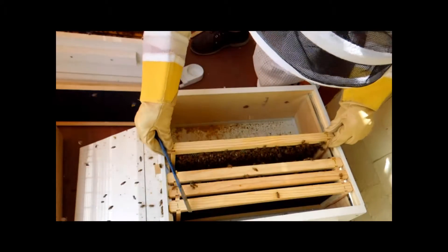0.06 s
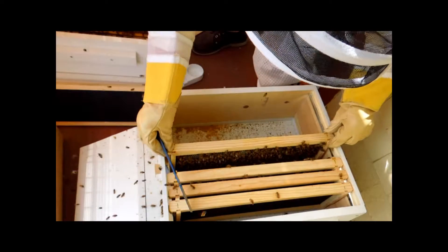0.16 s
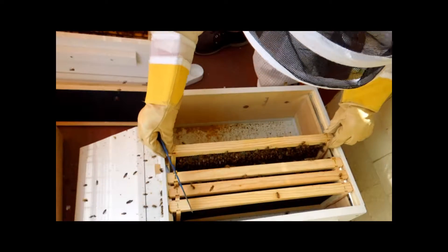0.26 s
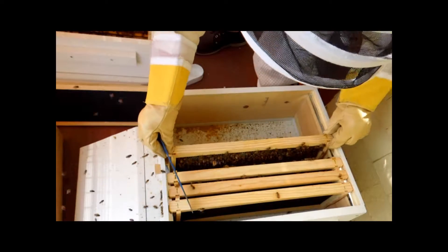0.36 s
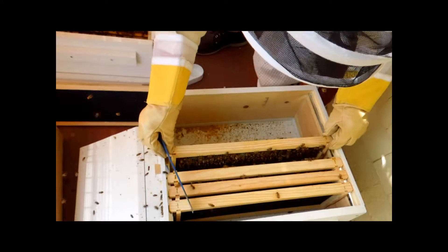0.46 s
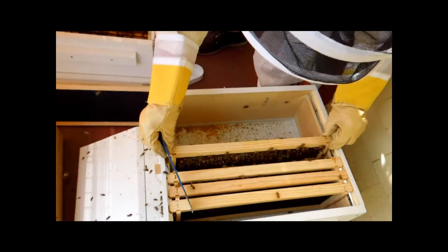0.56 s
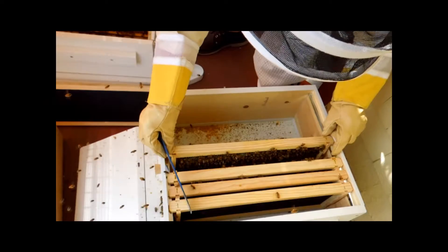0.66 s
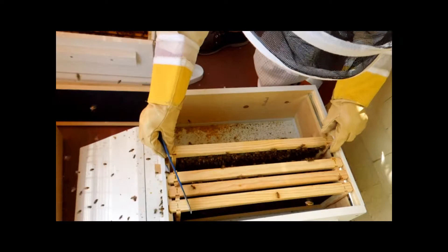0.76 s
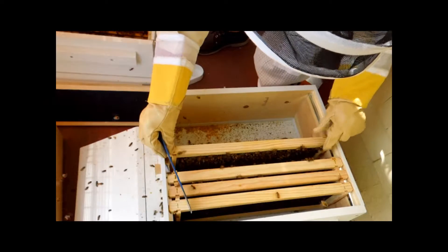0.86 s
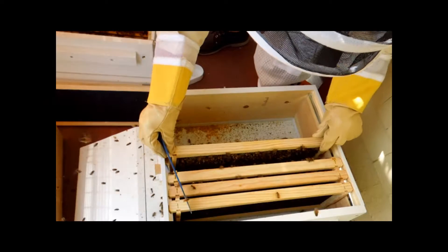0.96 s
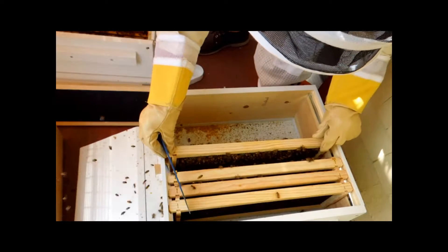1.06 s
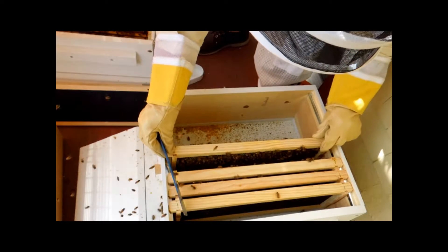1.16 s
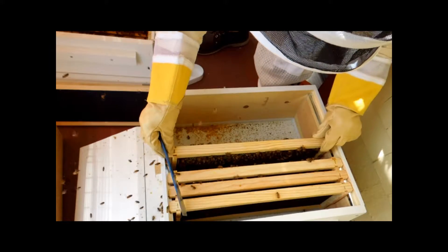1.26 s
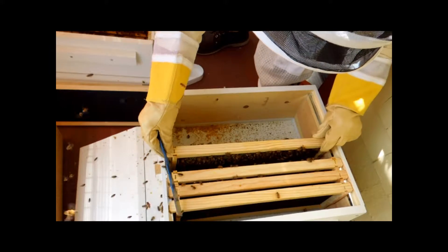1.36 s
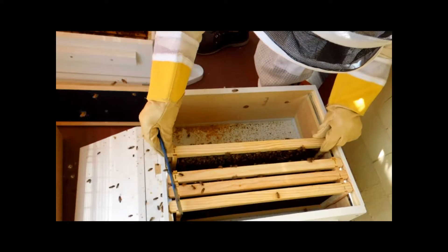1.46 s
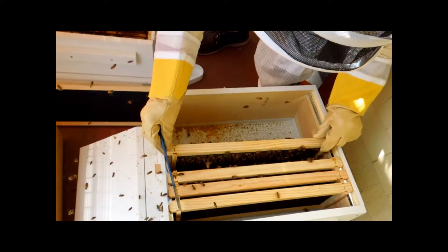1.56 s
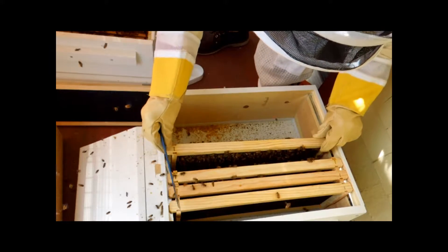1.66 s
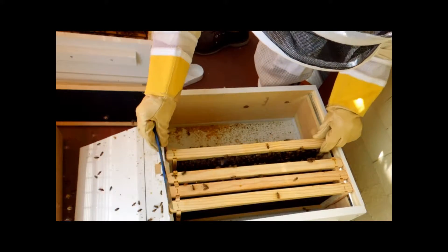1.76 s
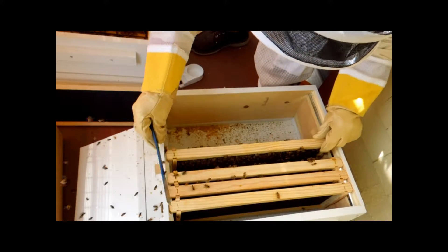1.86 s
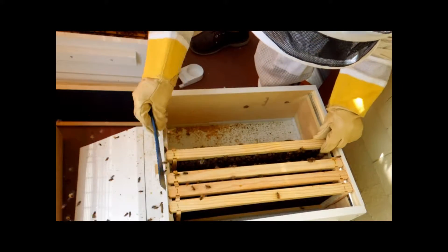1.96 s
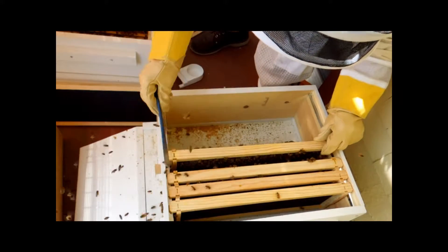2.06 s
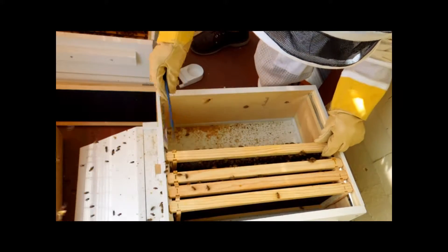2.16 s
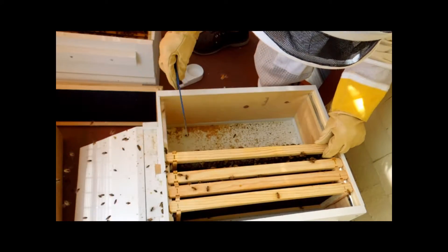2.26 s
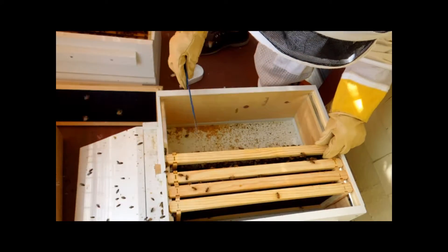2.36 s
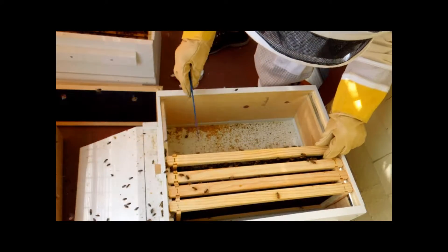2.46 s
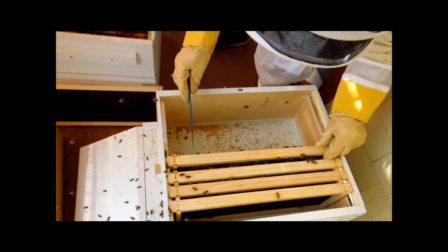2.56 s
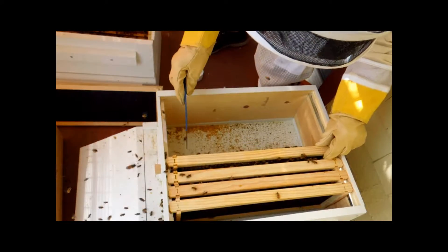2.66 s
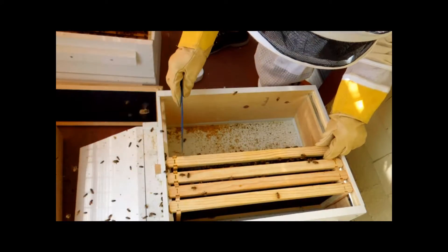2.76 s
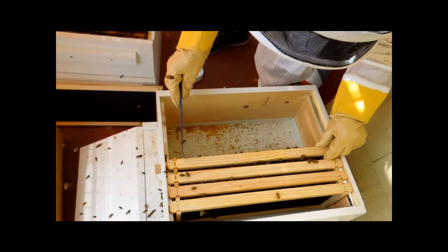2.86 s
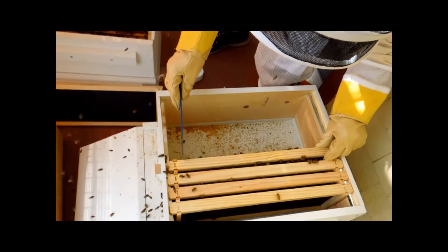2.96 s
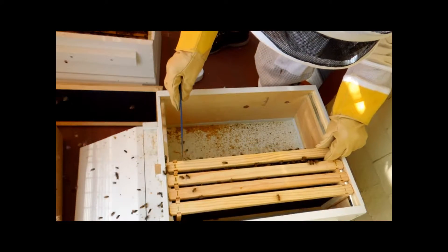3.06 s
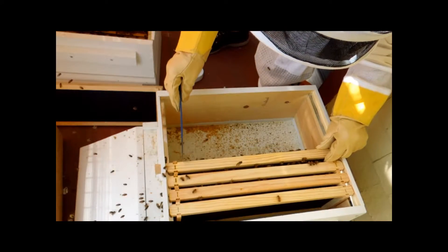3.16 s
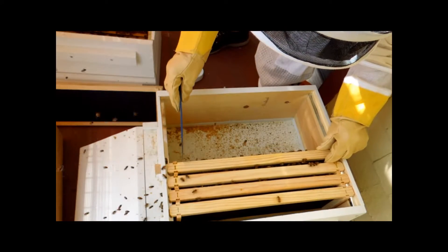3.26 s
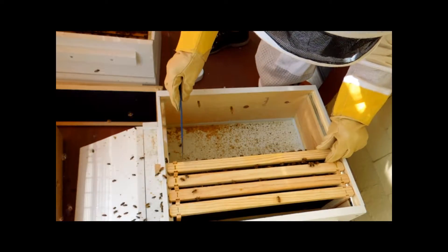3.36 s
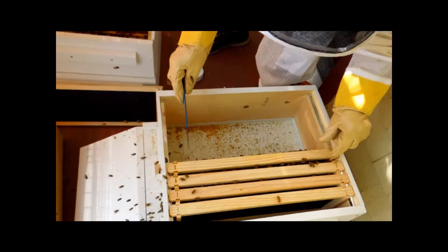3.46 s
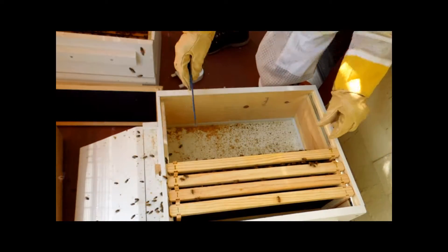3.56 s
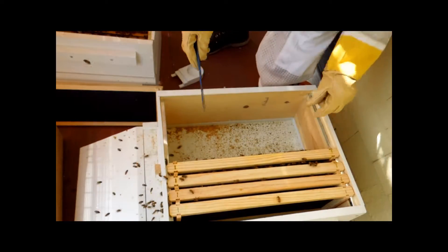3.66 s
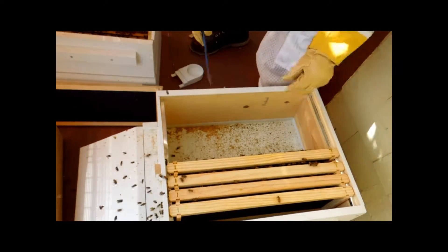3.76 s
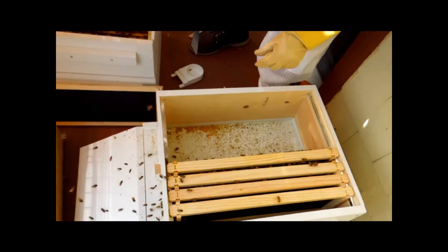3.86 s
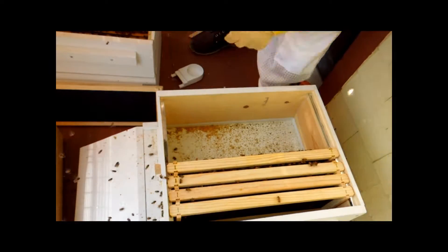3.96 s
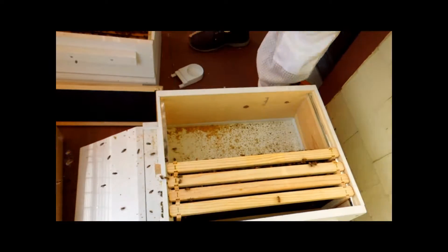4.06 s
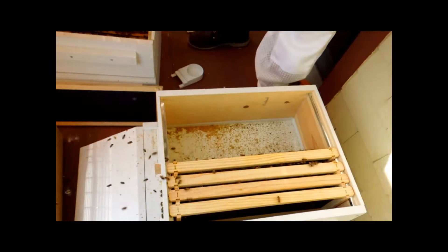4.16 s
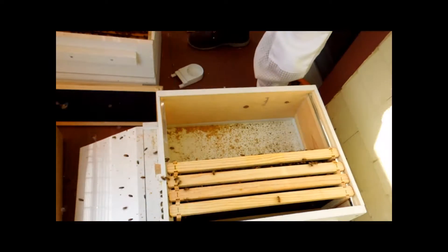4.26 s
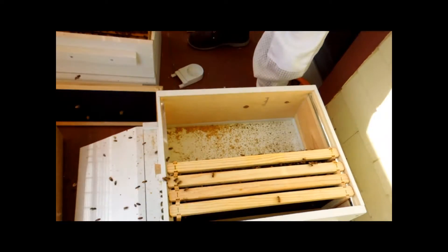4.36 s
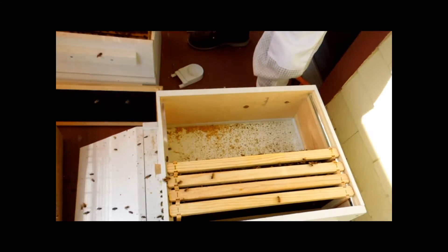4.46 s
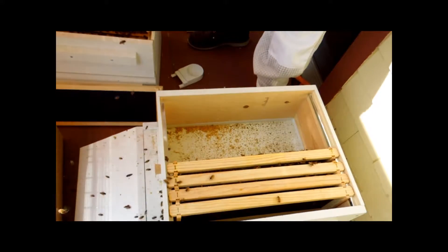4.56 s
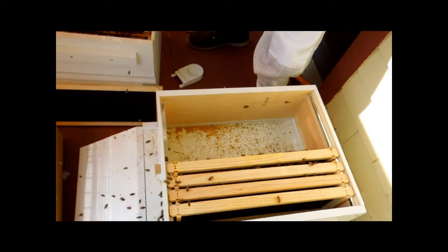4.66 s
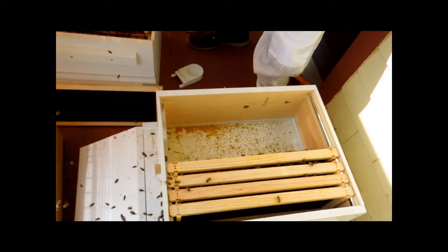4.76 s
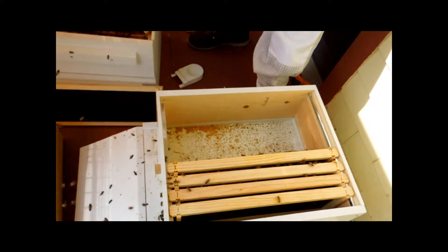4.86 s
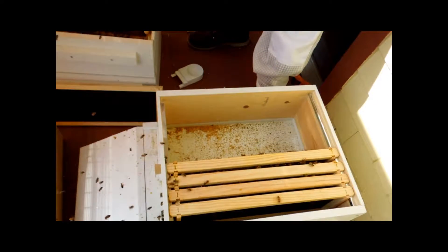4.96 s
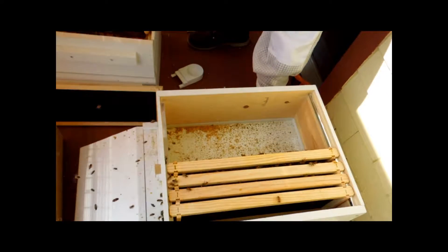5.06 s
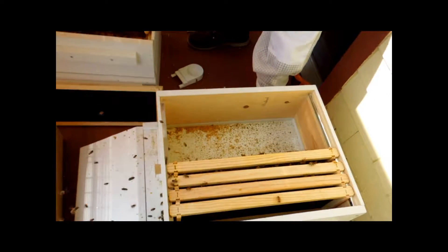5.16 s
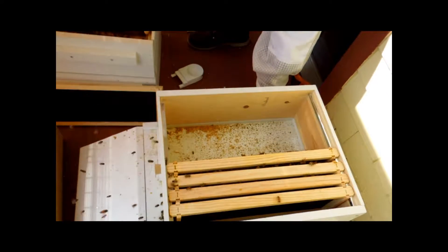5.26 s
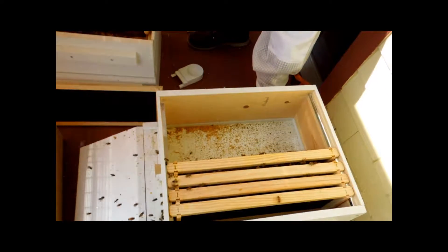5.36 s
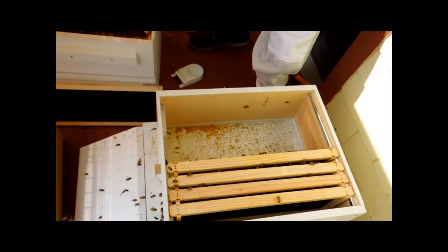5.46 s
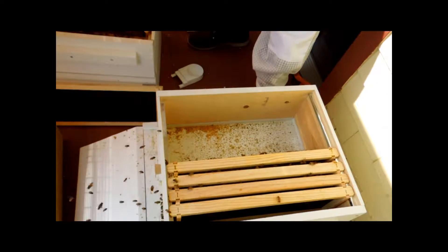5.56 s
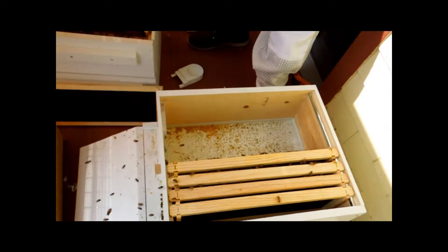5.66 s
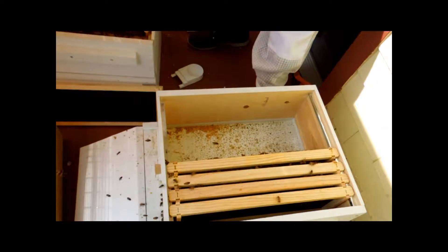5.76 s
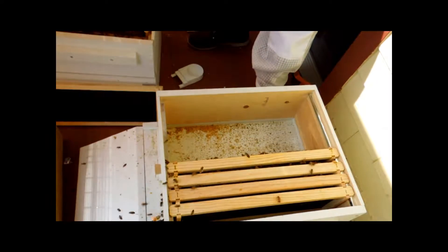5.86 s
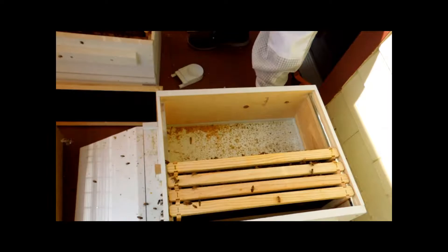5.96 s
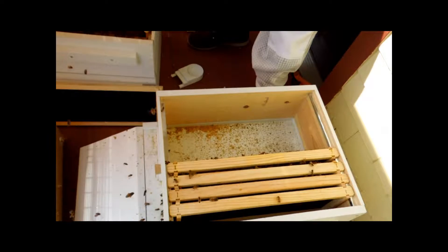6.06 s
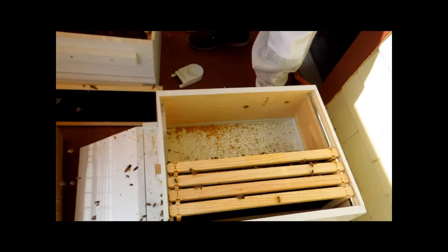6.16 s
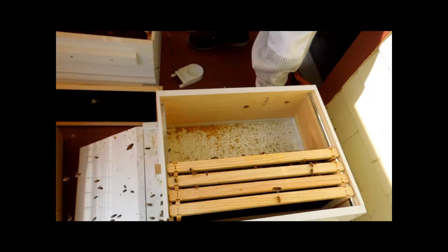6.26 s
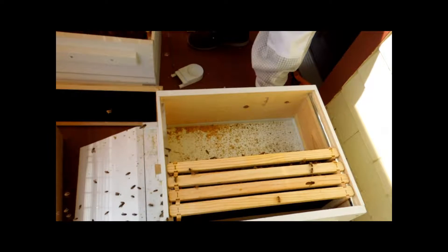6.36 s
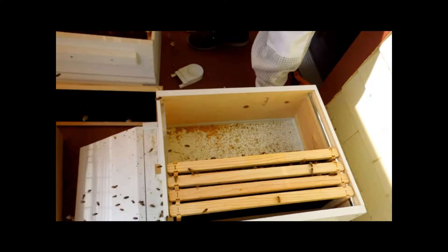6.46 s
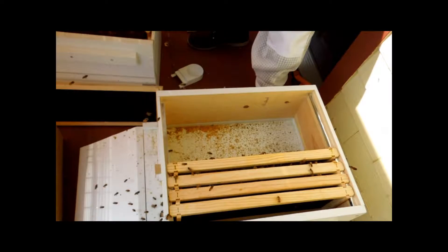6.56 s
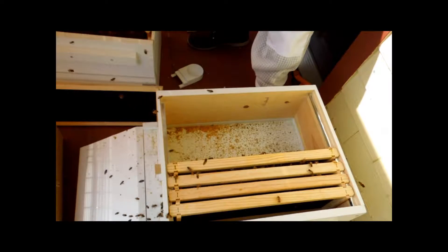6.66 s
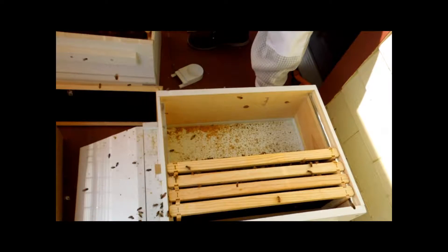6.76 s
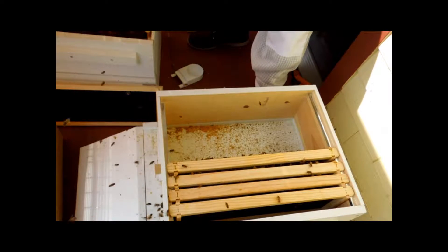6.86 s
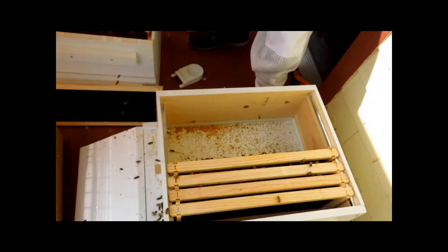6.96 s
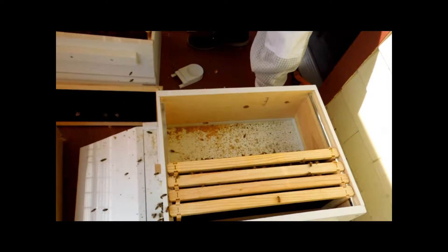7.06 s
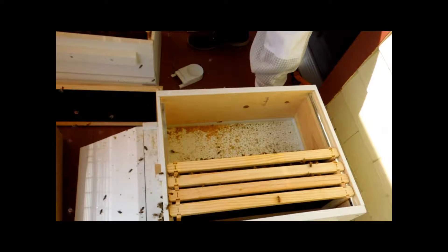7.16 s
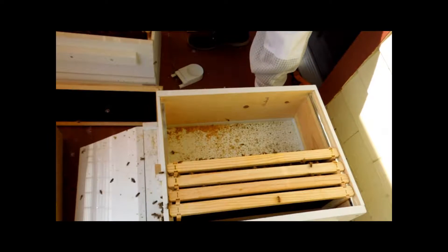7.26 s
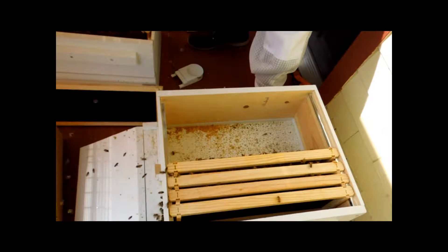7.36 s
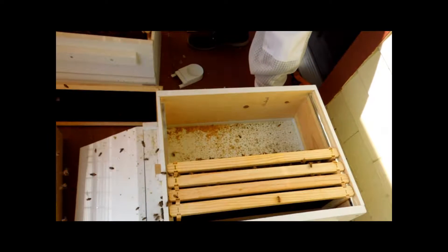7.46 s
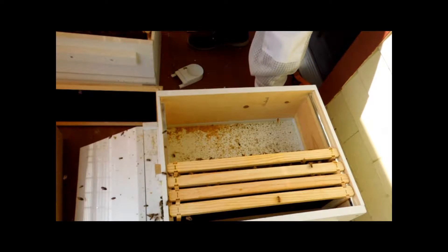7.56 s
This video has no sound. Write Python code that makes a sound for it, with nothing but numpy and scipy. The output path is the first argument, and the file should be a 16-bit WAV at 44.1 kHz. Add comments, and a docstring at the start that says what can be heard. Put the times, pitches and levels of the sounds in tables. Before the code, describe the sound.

Honey bees hum around an open hive outdoors, with one sharp wooden knock as a vehicle's drone slowly draws nearer.

```python
"""Honey bees hum around an open hive outdoors, each wing stroke a push of air; late on, one hovers close.
A beekeeper shifts frames: one knocks against the box, both ring, and the gain control dips after it.
A vehicle nears all the while: its exhaust drone climbs and swells, and its tyre roar rises at the end.
Gloves and suit rustle faintly, there is one soft bump, and a far bird chirps over the outdoor hiss."""
import sys
import numpy as np
from scipy import signal
from scipy.fft import rfft, irfft
from scipy.io import wavfile
from scipy.ndimage import uniform_filter1d, map_coordinates

SR = 44100
rng = np.random.default_rng(int(sys.argv[2]) if len(sys.argv) > 2 else 0)


def to_wav(s):
    """Save 16-bit WAV."""
    ch = np.atleast_2d(s).T  # columns
    pcm = np.round(np.clip(ch, -1, 1) * 32767)  # PCM
    wavfile.write(sys.argv[1], SR, pcm.astype(np.int16))


N = 335592
TIME = np.arange(N) / SR
BINS_HZ = np.fft.rfftfreq(N, 1 / SR)


def wingbeats(beat_hz, sharpness=500):
    """One sharp push of air per wing stroke."""
    strokes = np.cumsum(beat_hz) / SR + rng.random()
    return np.exp(sharpness * (np.cos(2 * np.pi * strokes) - 1))


# swarm filter (frequency [Hz], relative gain [dB])
SWARM_FILTER = [(100, 48), (230, 11), (340, 12.5), (430, 8.5), (520, 4), (630, -7.5), (750, -7),
                (1150, -10.5), (1800, -17.5), (3000, -23.5), (6000, -32), (12000, -59)]

def bees(count=20, wing_hz=232, spread=.14, swerve=.04, distance_db=7, swarm_db=-42, stir_db=1.5, stir_s=5):
    """Each bee has its own wingbeat rate; its pitch and distance drift in flight."""
    swarm = np.zeros(N)
    for place in np.linspace(-1, 1, count):
        beat_hz = wing_hz * np.exp(spread * place + swerve * wander(3) + .006 * wander(30))
        swarm += wingbeats(beat_hz) * amp(distance_db * np.tanh(wander(3.022)))
    pressure = np.diff(swarm, prepend=swarm[0])
    restless_db = stir_db * np.minimum(TIME / stir_s, 1)  # moving the frames stirs the colony
    return colour(pressure, SWARM_FILTER) * amp(swarm_db + restless_db)


# closest bee's flight (time [s], wingbeat [Hz], level [dB])
NEAR_BEE_FLIGHT = [(4.7, 235, -76), (5.2, 239.8, -52.5), (5.75, 242.6, -54), (6.0, 250.7, -47.5),
                   (6.4, 257.3, -46), (6.9, 252.4, -45), (7.3, 256.2, -45), (7.61, 259, -51)]
# its wing filter (frequency [Hz], relative gain [dB])
NEAR_BEE_FILTER = [(150, -22), (250, -3), (500, -1), (770, 2.5), (1050, 0), (1480, 1.5), (2000, -0.5),
                   (2700, -8), (3600, -7.5), (6000, -14), (12000, -40)]

def near_bee(waver=0.00698, bob_db=2):
    """One bee hovers close; its rasping overtones stand out from the swarm."""
    buzz = wingbeats(curve(NEAR_BEE_FLIGHT) * np.exp(waver * wander(14)))
    level_db = curve(NEAR_BEE_FLIGHT, column=2) + bob_db * wander(7)
    return colour(buzz, NEAR_BEE_FILTER) * amp(level_db)


# frame meets box and settles (time [s], level [dB], decay [s])
CONTACTS = [(1.9017, -14, 0.0075), (1.9037, -10.5, 0.0037), (1.9095, -23.5, 0.023), (1.9264, -31, 0.011)]
# contact noise (frequency [Hz], relative level [dB])
CRACK_SPECTRUM = [(150, -8), (400, 7), (900, -2), (1500, -1), (3300, -4), (4300, -7), (4950, -5),
                  (6300, -10), (9000, -6), (12000, -1.5), (14200, -6.5)]
# frame and box modes (frequency [Hz], level [dB], t60 [s])
WOOD_MODES = [(105, -45, 0.1), (132.5, -7, 0.13), (187, -12, 0.17), (237, -29, 0.19), (275.4, -18, 0.23),
              (399, -12, 0.093), (483, -27, 0.19), (526, -16, 0.07), (574, -30, .06), (780, -18.5, 0.057),
              (995, -18, .08), (1146, -27, 0.12), (1250, -30, 0.11), (1530, -37, 0.063), (1910, -22, 0.069),
              (2740, -21, 0.058), (3040, -19, 0.042), (3370, -27, 0.068), (3830, -25, 0.038),
              (4870, -18, 0.049)]

def frame_knock(build_s=0.0021, settle_db=-9):
    """Quick contacts crack; the hardest rings frame and box, the last nudges them again."""
    contact = sum(amp(db) * (TIME >= s) * np.exp(-abs(TIME - s) / decay_s) for s, db, decay_s in CONTACTS)
    crack = contact * port_noise(CRACK_SPECTRUM)
    hardest_s, last_s = max(CONTACTS, key=lambda row: row[1])[0], CONTACTS[-1][0]
    age_s = TIME[:SR // 2]
    ring = sum(amp(db - 60 * age_s / t60) * np.sin(2 * np.pi * hz * age_s) for hz, db, t60 in WOOD_MODES)
    ring *= 1 - np.exp(-age_s / build_s)
    dull_ring = uniform_filter1d(ring, size=16)
    strike = np.interp(TIME - hardest_s, age_s, ring)
    nudge = amp(settle_db) * np.interp(TIME - last_s, age_s, dull_ring, left=0)
    return crack - strike - nudge


# firing note, swelling and fading as its path changes (time [s], level before beating [dB])
FIRING_LEVEL = [(0.0, -57.5), (0.3, -38.5), (2.42, -35), (2.76, -27.1), (3.14, -33), (3.66, -27),
                (4.14, -39), (4.6, -25.8), (5.06, -25), (5.18, -32.5), (5.28, -25), (6.2, -27),
                (6.3, -18.5), (6.44, -30.5), (6.54, -22.5), (7.28, -28), (7.6, -13)]

def firing_note_db(beat_hz=2.33, reflection_share=.48, from_s=4, dip_s=5.41):
    """Once the vehicle is close, a reflection with another Doppler shift beats against the note."""
    share = reflection_share * np.clip(TIME - from_s, 0, 1)
    return curve(FIRING_LEVEL) + interference_db(share, beat_hz * (TIME - dip_s) + .5)


# lesser exhaust overtones (order [x cycle rate], relative level [dB])
OVERTONE_ORDERS = [(6, -29), (7, -38), (9, -16.5), (10, -9), (11, -31.5), (12, -28.5), (13, -25), (14, -32),
                   (15, -19), (16, -22), (17, -27), (18, -25)]
# their growth on approach (time [s], base level [dB])
OVERTONE_SWELL = [(0, -45), (1.3, -40.5), (2.9, -37), (4.1, -34), (5.6, -28), (7.1, -29), (7.6, -26)]
# pipe resonances (centre [Hz], half width [Hz], lift [dB])
PIPE_RESONANCES = [(154.5, 3, 8), (208, 17.5, 28)]

def overtones_db(cycle_hz, echo_share=0.36, lag_s=.02773, lag_drift_s_per_s=-.000176, fade_db=2.0):
    """Pipe resonances lift passing overtones; a wall echo of shrinking lag lifts and cuts them in turn."""
    swell_db = curve(OVERTONE_SWELL)
    echo_s = lag_s + lag_drift_s_per_s * TIME
    orders = []
    for order, db in OVERTONE_ORDERS:
        hz = order * cycle_hz
        pipe_db = sum(lift / (1 + ((hz - centre) / width) ** 2) for centre, width, lift in PIPE_RESONANCES)
        echo_db = interference_db(echo_share, hz * echo_s)
        orders.append((order, swell_db + db + pipe_db + echo_db + fade_db * wander(4)))
    return orders


# engine speed (time [s], four-stroke cycle rate [Hz])
ENGINE_SPEED = [(0.0, 15.35), (0.45, 15.35), (1.3, 15.9), (2.5, 16.55), (3.1, 16.75), (3.85, 17.25),
                (4.6, 17.33), (5.55, 17.68), (6.0, 17.48), (6.9, 17.38), (7.2, 17.0), (7.61, 17.45)]
# strong note above the firing note (time [s], level [dB])
UPPER_NOTE_LEVEL = [(0.0, -57), (1.24, -41.3), (2.82, -42), (3.02, -32.8), (3.86, -37.5), (4.06, -26.9),
                    (4.44, -27), (4.58, -34), (4.88, -25), (5.22, -33.5), (5.32, -24.5), (7.38, -27.5),
                    (7.5, -30.5), (7.6, -18.5)]

def exhaust(firing_order=5, upper_order=8, middle_order=10, close_from_s=5.5):
    """Uneven firing throbs once a cycle; the pipe spreads each throb and echoes blur it, most when far."""
    cycle_hz = curve(ENGINE_SPEED)
    cycles = np.cumsum(cycle_hz) / SR
    orders = [(firing_order, firing_note_db()), (upper_order, curve(UPPER_NOTE_LEVEL))]
    orders += overtones_db(cycle_hz)
    far = np.maximum(1 - TIME / close_from_s, 0)
    blur_rad, spread_rad = .18 + .3 * far, .19 + .5 * far
    drone = np.zeros(N)
    for order, db in orders:
        pipe_rad = spread_rad * (order - middle_order) ** 2
        echo_rad = (blur_rad * wander(1) + .06 * wander(10)) * (order / middle_order) ** 2
        drone -= amp(db) * np.cos(2 * np.pi * order * cycles - pipe_rad - echo_rad)
    firing_strength = 1 + .05 * wander(45)
    return np.sqrt(2) * drone * firing_strength


# tyre roar (frequency [Hz], relative level [dB])
TYRE_SPECTRUM = [(100, -26), (240, 1), (400, 2.5), (620, -4.5), (900, -2), (1400, -2.5), (2000, -7),
                 (3200, -15.5), (6000, -19), (14000, -18)]
# low rumble (frequency [Hz], relative level [dB])
RUMBLE_SPECTRUM = [(12, -19), (33, 8), (55, 1), (90, 8.5), (170, 1.5), (250, 4.5), (310, 2), (390, -5.5),
                   (520, -0.5), (900, -42)]
# its growth (time [s], level [dB])
RUMBLE_SWELL = [(0, -69), (2.3, -44.5), (4.5, -41.5), (5.7, -42.5), (6.9, -37.5), (7.61, -26.5)]

def road_noise(start_m=70.6, speed_m_per_s=8.93, aside_m=3.6, tyres_at_1m_db=-19.0, flutter_db=1.1):
    """Tyre roar grows as 1/distance while the vehicle nears; a low rumble swells with it."""
    distance_m = np.hypot(aside_m, start_m - speed_m_per_s * TIME)
    roar = port_noise(TYRE_SPECTRUM) * amp(tyres_at_1m_db + flutter_db * wander(70)) / distance_m
    rumble = port_noise(RUMBLE_SPECTRUM) * amp(curve(RUMBLE_SWELL))
    return roar + rumble


# brushes of glove, tool and suit (mid time [s], level [dB], length [s], band centre [Hz])
BRUSHES = [(.037, -41.5, 0.053, 4500), (0.278, -47, 0.027, 3580), (.797, -44.5, 0.037, 3980),
           (3.552, -44.5, 0.012, 3500), (3.891, -48, .067, 4000), (4.137, -41, 0.06, 11500),
           (4.203, -42, .05, 9500), (4.247, -44.5, 0.94, 9500), (4.278, -46, .06, 5800),
           (4.713, -42.5, .016, 2800), (7.081, -39, .014, 4000)]

def rustles(stereo_width=0.043, width_octaves=1.0):
    """Swells of friction noise, each in its own band."""
    out, hz = np.zeros((2, N)), np.fft.rfftfreq(SR, 1 / SR) + 1
    for s, db, length_s, centre_hz in BRUSHES:
        band = np.exp(-.5 * (np.log2(hz / centre_hz) / width_octaves) ** 2)
        mid, side = irfft(rfft(rng.standard_normal((2, SR))) * band)[:, :round(length_s * SR)]
        friction = unit(np.array([mid + stereo_width * side, mid - stereo_width * side]))
        add_centred(out, s, amp(db) * friction * np.hanning(len(mid)))
    return out


def bump(at_s=4.722, hz=325, db=-31, length_s=0.056):
    """One soft, hollow bump."""
    out, age_s = np.zeros(N), TIME[:round(length_s * SR)]
    add_centred(out, at_s, amp(db) * np.hanning(len(age_s)) * np.sin(2 * np.pi * hz * age_s))
    return out


# bird calls (mid time [s], level [dB], length [s])
BIRD_CHIRPS = [(0.896, -52, .057), (1.588, -49, .05), (1.682, -52, .04), (2.18, -45.5, 0.037),
               (2.782, -45, 0.062), (2.931, -43.5, 0.063), (7.147, -47, .06), (7.36, -50, .06)]

def far_bird(top_hz=2990, droop_hz=70, rasp=0.028):
    """Thin chirps whose pitch arches and trembles."""
    out = np.zeros(N)
    for s, db, length_s in BIRD_CHIRPS:
        arch_hz = top_hz - droop_hz * np.linspace(-1, 1, round(length_s * SR)) ** 2
        hz = arch_hz * (1 + rasp * wander(402)[:len(arch_hz)])
        add_centred(out, s, amp(db) * np.hanning(len(hz)) * np.sin(2 * np.pi * np.cumsum(hz) / SR))
    return out


# outdoor background (frequency [Hz], relative level [dB])
AIR_SPECTRUM = [(20, -12), (60, 3.5), (110, 7), (200, 7), (330, 4.5), (650, -5), (1100, -3.5), (2000, -19),
                (3000, -56.5), (4200, -28.5), (6200, -15.5), (9000, -11), (12000, -6), (14200, -12.5)]

def air(level_db=-39.0, drift_db=-0.48):
    """Low outdoor noise with a bright hiss on top."""
    return port_noise(AIR_SPECTRUM) * amp(level_db + drift_db * wander(5.5))


# likeness of the two microphone ports (frequency [Hz], correlation [0..1])
PORT_CORRELATION = [(25, .88), (100, .993), (2500, .982), (4500, .9), (6500, .62), (9000, .38), (14000, .3)]

def port_noise(spectrum_db):
    """Shaped noise at both ports, rms 1: alike in the bass, partly unrelated in the treble."""
    mid, side = rfft(rng.standard_normal((2, N))) * amp(spectrum(spectrum_db))
    correlation = spectrum(PORT_CORRELATION)
    mid, side = mid * np.sqrt(1 + correlation), side * np.sqrt(1 - correlation)
    return unit(irfft([mid + side, mid - side], N))


def interference_db(share, lag_cycles):
    """Gain of a tone joined by a weaker, lagging copy."""
    return 10 * np.log10(1 + share ** 2 + 2 * share * np.cos(2 * np.pi * lag_cycles) + 1e-6)


def amp(db):
    """Decibels to gain."""
    return 10 ** (np.asarray(db) / 20)


def unit(x):
    """Scales to rms 1."""
    return x / np.sqrt(np.mean(x ** 2) + 1e-20)


def curve(rows, column=1):
    """One column of a time table at every sample."""
    rows = np.array(rows)
    return np.interp(TIME, rows[:, 0], rows[:, column])


def spectrum(points):
    """A frequency table at every bin, joined on a log axis."""
    hz, value = np.transpose(points)
    return np.interp(np.log(BINS_HZ + 1), np.log(hz), value)


def colour(x, spectrum_db):
    """Filters x, to rms 1."""
    return unit(irfft(rfft(x) * amp(spectrum(spectrum_db)), N))


def wander(knots_per_s):
    """Smooth random drift of about unit size."""
    knots, coarse_s = rng.standard_normal(2048), TIME[::64]
    drift = map_coordinates(knots, [coarse_s * knots_per_s], order=3, mode="wrap")
    return np.interp(TIME, coarse_s, drift)


def add_centred(mix, at_s, sound):
    """Mixes a sound in, centred on at_s."""
    start = max(round(at_s * SR) - sound.shape[-1] // 2, 0)
    part = mix[..., start:start + sound.shape[-1]]
    part += sound[..., :part.shape[-1]]


def scene():
    """All sources at the two ports."""
    surroundings = air() + road_noise() + exhaust()
    return surroundings + bees() + near_bee() + frame_knock() + rustles() + bump() + far_bird()


# port imbalance (frequency [Hz], left minus right [dB])
PORT_BALANCE = [(25, 3.5), (85, 1.3), (170, .2), (400, -.2), (4000, .1), (9000, 2.2), (14000, 2.6)]
# port phase offset (frequency [Hz], right lead [rad])
PORT_PHASE = [(25, .75), (85, .46), (150, .28), (300, .17), (1000, .05), (4000, 0)]

def record(dry, threshold_db=-17.5, squeeze=0.44, recovery_db_per_s=12, ceiling=.54, cutoff_hz=14330):
    """Unequal ports, gain control (quick fall, slow recovery), soft peak limiter, low-pass."""
    half = np.array([[.5], [-.5]])
    mismatch = amp(spectrum(PORT_BALANCE) * half) * np.exp(-1j * spectrum(PORT_PHASE) * half)
    ports = irfft(rfft(dry) * mismatch, N)
    power = uniform_filter1d((ports ** 2).mean(0), size=500)
    power_db = 10 * np.log10(abs(power) + 1e-12)
    recovery_db = TIME * recovery_db_per_s
    held_db = np.maximum.accumulate(power_db + recovery_db) - recovery_db
    over_db = np.maximum(held_db - threshold_db, 0)
    ducked = ports / amp(squeeze * uniform_filter1d(over_db, size=100))
    limited = ducked / (1 + (ducked / ceiling) ** 8) ** (1 / 8)
    lowpass = signal.firwin(801, cutoff_hz, window=("kaiser", 8), fs=SR)
    return signal.oaconvolve(limited, lowpass[None], "same", axes=1)


dry = scene()
out = record(dry)
to_wav(out)
```